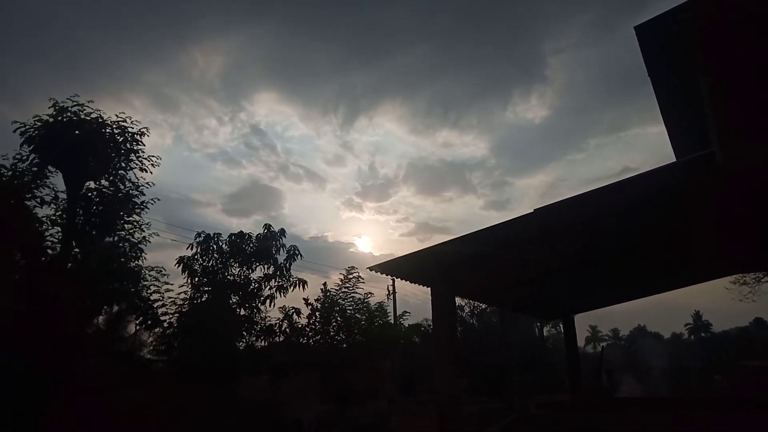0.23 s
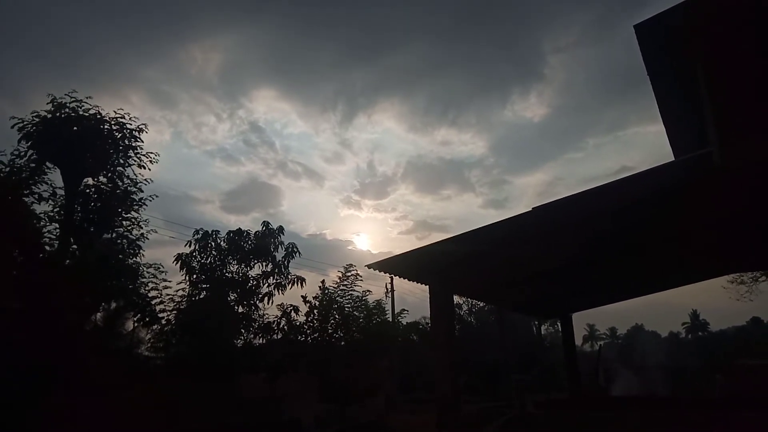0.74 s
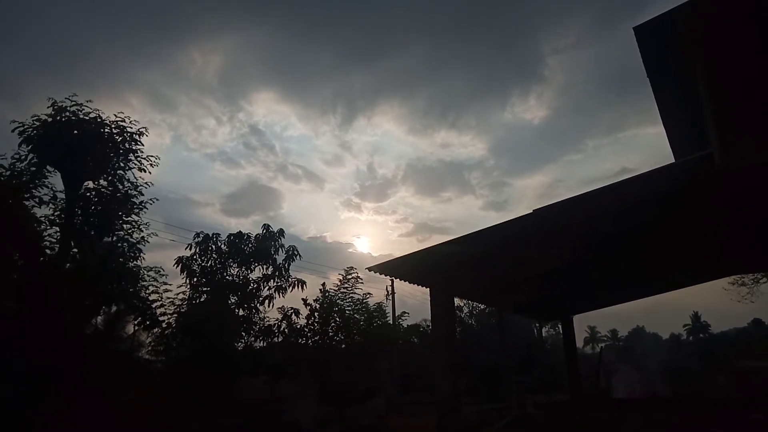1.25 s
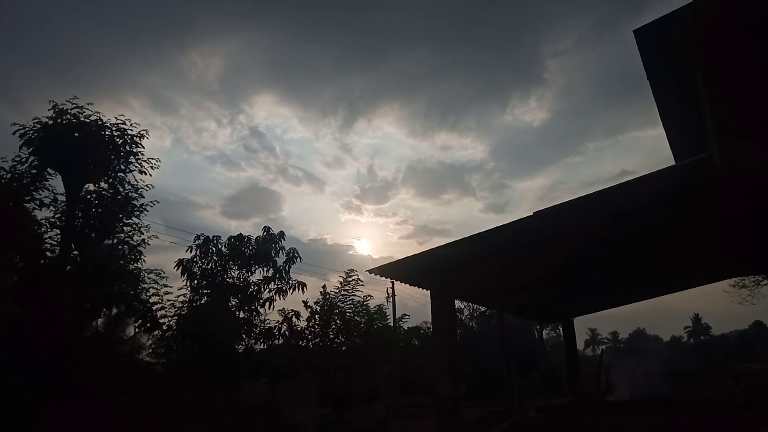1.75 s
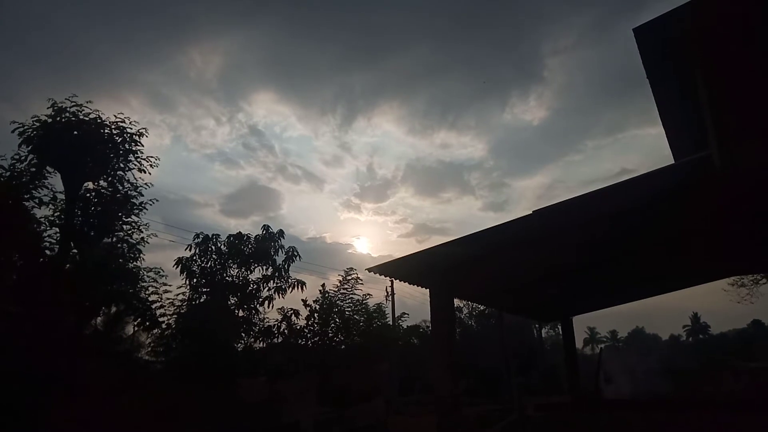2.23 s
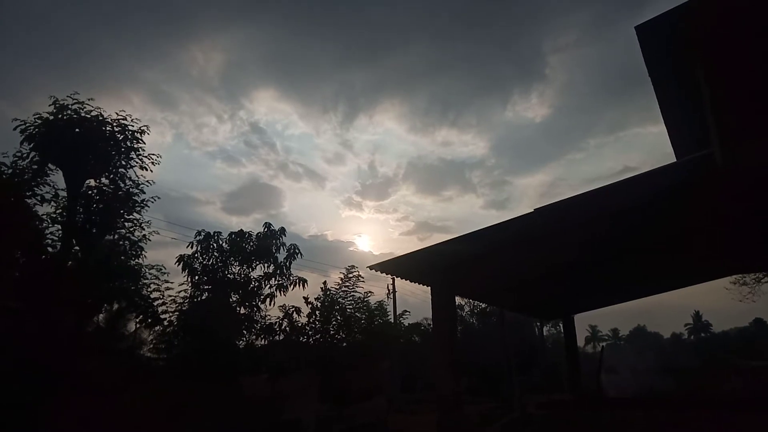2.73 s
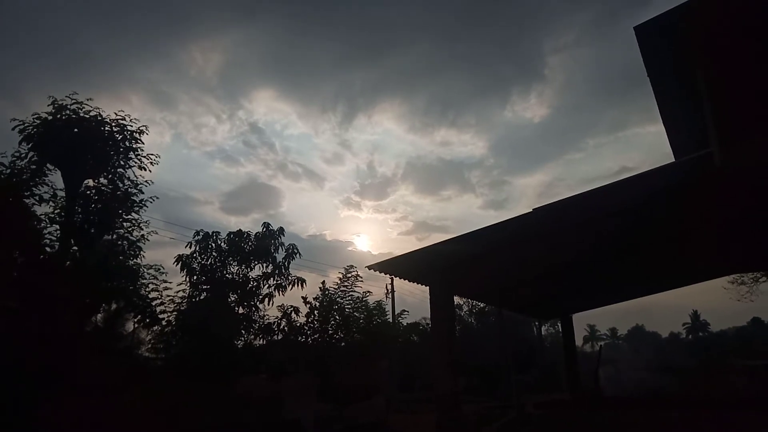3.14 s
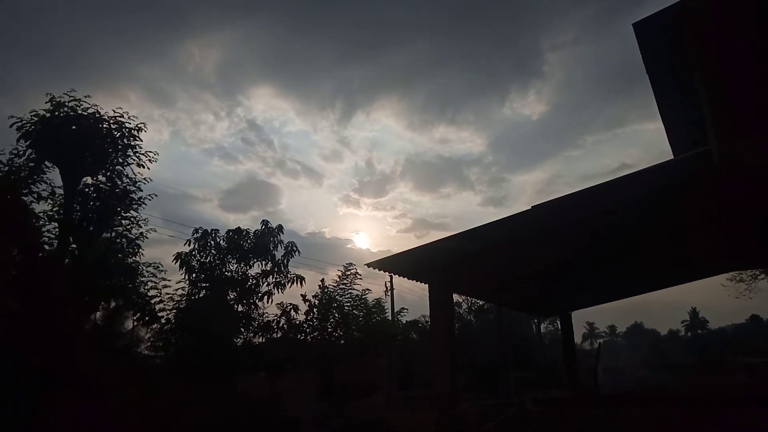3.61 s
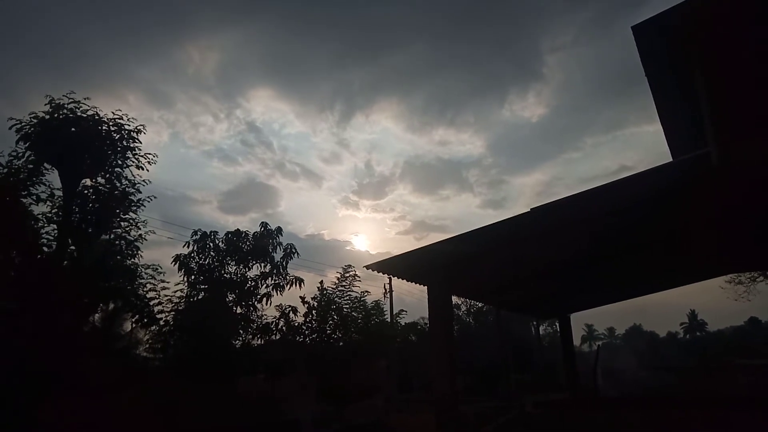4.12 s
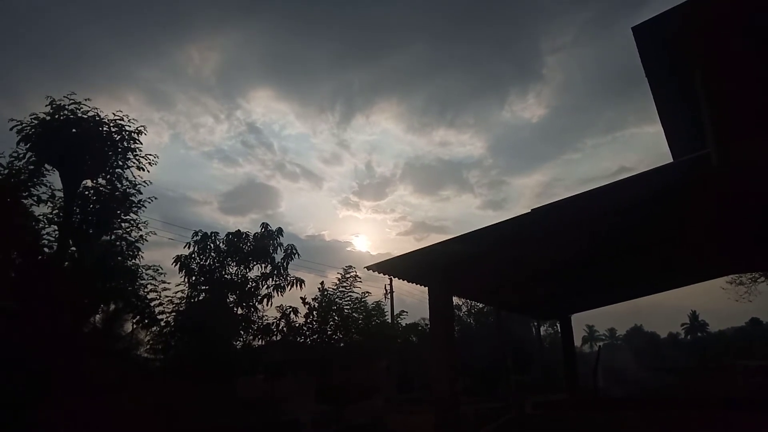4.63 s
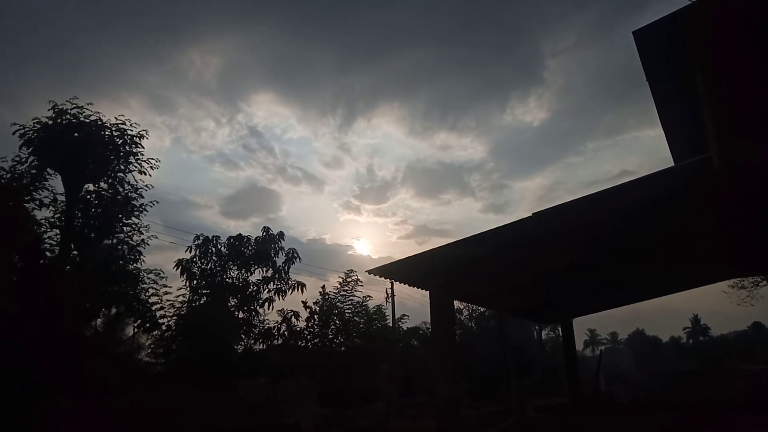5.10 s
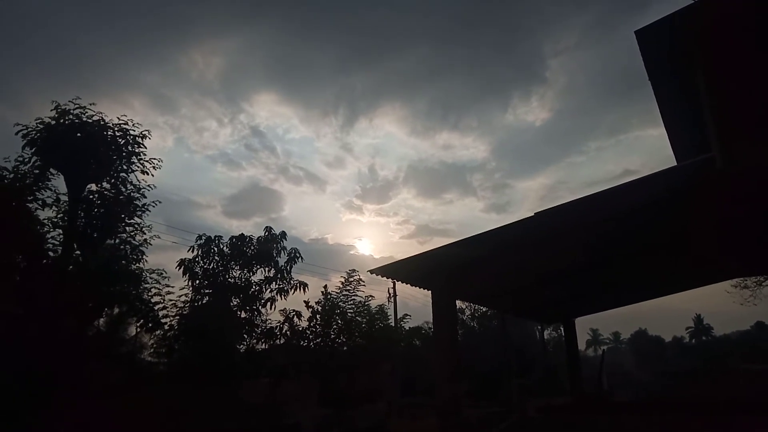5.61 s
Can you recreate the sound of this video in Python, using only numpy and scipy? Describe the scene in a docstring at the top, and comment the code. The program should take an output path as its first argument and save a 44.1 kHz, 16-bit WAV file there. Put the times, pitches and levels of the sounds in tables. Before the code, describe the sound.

Clear bird whistles in two-note phrases and a high bird's winding, diving notes echo among trees over steady insect hiss, ending with light wooden knocks.

```python
"""A low whistler calls in two-note phrases at sunrise in a village; a high singer winds, arches and dives
above it, with fainter birds, peeps and blurred chatter. Birds are near-sine glides echoed by trees and walls.
Insects and background are coloured noise, far traffic is low throbbing noise, soft bumps are swells of
band noise, and a few close knocks on wood ring decaying modes with a gritty scrape.
"""
import sys
import numpy as np
from scipy import signal
from scipy.fft import rfft, irfft, next_fast_len
from scipy.io import wavfile
from scipy.ndimage import uniform_filter1d

SR = 44100
rng = np.random.default_rng(int(sys.argv[2]) if len(sys.argv) > 2 else 0)


def unload_wav(signal):
    """Save mono or channel-first audio to the path in sys.argv[1] as 16-bit WAV at rate SR, clipped to [-1, 1]."""
    wavfile.write(
        sys.argv[1],
        SR,
        np.round(np.clip(np.atleast_2d(signal).T, -1, 1) * 32767).astype(np.int16),
    )


N = 258426  # length in samples


def undb(db):
    """Decibels to amplitude gain."""
    return 10 ** (np.asarray(db) / 20)


def unit(x):
    """Scales a sound to rms 1."""
    return x / np.sqrt(np.mean(x ** 2))


def band(count, hz, width, order):
    """Band-passed noise around a centre pitch, rms 1."""
    edges = [max(hz - width / 2, 20), hz + width / 2]
    bandpass = signal.butter(order, edges, "band", fs=SR, output="sos")
    return unit(signal.sosfilt(bandpass, rng.standard_normal(count)))


def walk(rate):
    """Random levels, rate a second, joined by smooth cosine steps; spread near 1."""
    place = np.arange(N) * rate / SR
    step = np.linspace(0, 1, 9)[:-1]
    levels = rng.standard_normal(int(place[-1]) + 2)
    ease = (1 - np.cos(np.pi * step)) / 2
    smooth = levels[:-1, None] + np.diff(levels)[:, None] * ease
    # the joins narrow the spread; 1.15 restores it
    return 1.15 * np.interp(place, np.arange(smooth.size) / 8, smooth.ravel())


def add(track, s, sound):
    """Mixes a sound into a track at a time in seconds."""
    i = min(max(int(s * SR), 0), len(track))
    track[i:i + len(sound)] += sound[:len(track) - i]


def glide(n, hz0, hz1):
    """A soft-ended tone of n samples sliding between two pitches, rms 1."""
    phase = 2 * np.pi * np.cumsum(np.linspace(hz0, hz1, n)) / SR
    return 2 * np.sin(np.pi * np.arange(n) / n) * np.sin(phase)


def sing(notes, waver, edge_s, third=0):
    """Near-sine syrinx tones; notes that touch share their phase, so they join without a click."""
    t, hz, gain = np.arange(N) / SR, np.zeros(N), np.zeros(N)
    for note in notes:
        s, note_hz, db = np.transpose(note)
        on = (t >= s[0]) & (t < s[-1])
        hz[on] = np.interp(t[on], s, note_hz)
        gain[on] = undb(np.interp(t[on], s, db))
    edge = int(edge_s * SR)
    gain = uniform_filter1d(gain, edge)
    hz = np.interp(t, t[hz > 0], hz[hz > 0])  # pitch carries on through the silences
    wavering_hz = uniform_filter1d(hz, edge) * (1 + waver * walk(60))
    phase = 2 * np.pi * np.cumsum(wavering_hz) / SR
    return np.sqrt(2) * gain * (np.sin(phase) + third * np.sin(3 * phase))


def trees(x, wet_db, t60, gap_s, walls, sway_s, clump_db=3.5, dull_hz=4400, beam_hz=100):
    """Direct sound, echoes off walls (s, dB) and a duller scattered tail from clumps of swaying leaves."""
    t = np.arange(SR) / SR
    decay = np.exp(-np.log(1000) * t / t60)
    onset = 1 - np.exp(-t / gap_s)
    clumps = undb(clump_db * walk(29.86)[:SR])
    tail = rng.standard_normal(SR) * decay * onset * clumps
    tail = undb(wet_db) * tail / np.sqrt(np.sum(tail ** 2))
    for s, db in walls:  # each wall smears its echo over a few milliseconds
        smear = rng.standard_normal(300) * np.hanning(300) / np.sqrt(112)
        add(tail, s, undb(db) * smear)
    leaves = signal.butter(N=4, Wn=dull_hz, fs=SR, output="sos")
    dull_tail = signal.sosfilt(leaves, tail)
    # moving leaves shift the path lengths, which blurs the pitch of what comes back
    swayed = np.interp(np.arange(N) + sway_s * SR * walk(40), np.arange(N), x)
    swayed *= np.minimum(np.arange(N) / (.01 * SR), 1)  # a note under way at the start throws no click
    # the beak beams high pitches at the listener; below beam_hz the sound goes mostly to the trees
    beam = signal.butter(N=8, Wn=beam_hz, btype="high", fs=SR, output="sos")
    return signal.sosfilt(beam, x) + signal.oaconvolve(swayed, dull_tail)[:N]


def shaped(shape, s, length, hz, db):
    """Places a note shape in time, pitch and level."""
    return [(s + length * u, hz * share, db + d) for u, share, d in shape]


# Two-note call of the low whistler. Each row: top of first note in seconds, its pitch in Hz, level in dB,
# start of second note in seconds, its length in seconds, top pitch in Hz, level in dB.
WHISTLER_CALLS = [(0.032, 2030, -27, 0.26, 0.21, 2154, -31.5), (2.57, 2001, -30, 2.808, 0.2, 2120, -32.5),
                  (4.361, 2009, -29.5, 4.612, .188, 2080, -33)]
# First note: up to a ledge, a bump, then down. Each row: seconds from its top, share of top pitch,
# level in dB against the top.
LEDGE_SHAPE = [(-.102, .84, -20), (-.078, .97, -7), (-.04, .975, -8), (0, 1, 0), (.028, .925, -9.5),
               (.057, .855, -13)]
# Second note: a quick peak and a long fall. Each row: share of length, share of top pitch,
# level in dB against the top.
FALL_SHAPE = [(0, .81, -14.5), (.093, 0.95, -1), (.19, 1, 0), (.31, .918, -1), (.51, .857, -5.5),
              (.68, .82, -9.5), (.8, .73, -13.5), (1, .6, -19.5)]


def whistles():
    """Pitch and level contours of both notes of every call: a ledge note, then a falling one."""
    notes = []
    for top_s, hz1, db1, start_s, length, hz2, db2 in WHISTLER_CALLS:
        notes.append(shaped(LEDGE_SHAPE, top_s, 1, hz1, db1))
        notes.append(shaped(FALL_SHAPE, start_s, length, hz2, db2))
    return notes


# Colour of the insects and steady background. Each row: frequency in Hz, relative density in dB per Hz.
AIR_COLOUR = [(25, -31.5), (170, -24), (300, -19.5), (700, -26.5), (1100, -22), (1600, -16), (2200, -9.5),
              (3500, -9), (4500, -7.5), (4950, -3), (5500, -6.5), (6500, -0.5), (8300, -3), (9300, -18),
              (10400, -33.5), (12000, -39.5), (15500, -36)]
AIR_DB = -50.5  # rms of the whole bed


def air():
    """Third-octave noise bands: insect hiss holds steady, lower bands swell and flicker in patches."""
    size = next_fast_len(N)
    f = np.fft.rfftfreq(size, 1 / SR) + 1
    swell = walk(1.493)  # shared by all bands
    colour_hz, colour_db = np.transpose(AIR_COLOUR)
    colour = undb(np.interp(np.log(f), np.log(colour_hz), colour_db))
    noise = rfft(rng.standard_normal(size)) * colour
    bed = np.zeros(N)
    for hz in 200 * 2 ** (np.arange(16) / 3):
        # the end bands take in everything below 200 and above 6400 Hz
        thirds_away = 3 * np.log2(np.clip(f, 200, 6400) / hz)
        share = np.cos(np.pi / 2 * np.clip(thirds_away, -1, 1)) ** 2
        restless = 0.12 + 1.57 / (1 + (hz / 3500) ** 4)
        motion_db = restless * (1.48 * swell + 1.1 * walk(5) + 2.45 * walk(14))
        bed += irfft(noise * share, size)[:N] * undb(motion_db)
    return unit(bed) * undb(AIR_DB)


# Level of the low rumble: slow swells of far traffic, with brief low surges near 3.85 and 5.56 s. Each row:
# time in seconds, level in dB before the throb.
RUMBLE_LEVELS = [(0.0, -69.5), (0.67, -64.5), (1.94, -75.5), (2.48, -67), (3.18, -80.5), (3.28, -67),
                 (3.79, -74), (3.85, -58.5), (3.92, -71.5), (4.41, -73.5), (4.65, -64.5), (5.47, -79),
                 (5.56, -60), (5.86, -64)]


def rumble():
    """Low traffic noise that swells and throbs."""
    s, db = np.transpose(RUMBLE_LEVELS)
    throb_db = 1.5 * walk(5.5) + 2.3 * walk(15)
    level = undb(np.interp(np.arange(N) / SR, s, db) + throb_db)
    return level * band(count=N, hz=118, width=99, order=2)


# Short faint calls. Each row: start in seconds, length in seconds, start pitch in Hz, end pitch in Hz,
# level in dB.
FAINT_CALLS = [(0, .059, 4180, 4000, -52.5), (1.364, 0.098, 3280, 3290, -66.5),
               (1.499, 0.091, 2236, 2260, -64), (1.593, 0.037, 2280, 2236, -54.5),
               (1.871, 0.043, 1276, 1300, -74), (1.97, 0.058, 531, 498, -71), (2.225, .06, 1056, 947, -73),
               (2.517, 0.054, 1046, 1046, -68.5), (2.715, 0.019, 4800, 5004, -55),
               (2.736, .016, 5090, 4710, -54), (2.957, 0.013, 3080, 3500, -48.5),
               (3.03, 0.05, 505, 478, -68.5), (3.72, .06, 1002, 995, -72.5),
               (4.042, 0.043, 1276, 1240, -67.5), (4.369, 0.022, 3037, 3310, -55),
               (4.584, .028, 935, 1066, -60), (4.674, .021, 2530, 2700, -51),
               (4.979, .014, 3390, 3450, -55), (5.085, .028, 2780, 2650, -53.5),
               (5.185, .054, 622, 576, -65.5), (5.231, 0.078, 908, 897, -71),
               (5.471, 0.075, 750, 700.3, -66.5)]


def peeps():
    """Each faint call is one short soft-ended glide."""
    out = np.zeros(N)
    for s, length, hz0, hz1, db in FAINT_CALLS:
        add(out, s, undb(db) * glide(int(length * SR), hz0, hz1))
    return out


# Distant chatter. Each row: start in seconds, length in seconds over which chirps begin, lowest pitch in Hz,
# highest pitch in Hz, level in dB before the scaling by length and each chirp's random cut.
CHATTER_BURSTS = [(.02, 0.13, 2400, 2740, -52), (.42, 0.18, 2270, 3960, -59), (0.6, 0.25, 2086, 2904, -54),
                  (0.698, 0.14, 3146, 3950, -50.5), (1.098, 0.25, 2330, 3010, -72),
                  (1.448, 0.26, 1690, 3023, -60.5), (1.852, 0.12, 1920, 2390, -67),
                  (2.101, 0.33, 1588, 3034, -59), (3.549, 0.092, 2895, 3383, -59),
                  (3.599, 0.33, 1797, 2800, -60.5), (4.565, 0.077, 987, 1640, -58),
                  (4.904, .2, 2250, 3030, -57.5), (5.098, 0.65, 1917, 3314, -72)]


def chatter():
    """Every burst is a crowd of quick chirps at random times, pitches and strengths."""
    out = np.zeros(N)
    crowds = rng.random((len(CHATTER_BURSTS), 30, 4))
    for (s, length, lo_hz, hi_hz, db), chirps in zip(CHATTER_BURSTS, crowds):
        span_hz = hi_hz - lo_hz
        for when, start, end, size in chirps:
            chirp = glide(int(0.016 * SR), lo_hz + start * span_hz, lo_hz + end * span_hz)
            add(out, s + when * length, undb(db - 4.5 * size) * np.sqrt(length) * chirp)
    return out


# Held notes of the high singer that dive. Each row: start in seconds, start pitch in Hz, held pitch in Hz,
# dive start in seconds, dive length in seconds, end pitch in Hz, held level in dB, dive level in dB.
SINGER_DIVES = [(.063, 3360, 3801, .148, .035, 2496, -25.5, -28.5),
                (2.44, 3824, 3899, 2.478, .025, 2275, -22, -21.5)]
RISE, SWELL = .4, 0.62  # shares of the hold at which pitch and full level arrive
PLUNGE = 0.44  # share of the dive at its loudest
START_DB, RISE_DB, CATCH_DB = -22.5, -7.5, -8  # against the held level: start, on pitch, just before the dive
END_DB = -33.5  # against the dive level


def dive(s, hz0, hz, dive_s, length, hz1, db, dive_db):
    """Contour of a held note: up to pitch, a swell, a catch, then a straight plunge."""
    hold = dive_s - s
    return [(s, hz0, db + START_DB),
            (s + RISE * hold, hz, db + RISE_DB),
            (s + SWELL * hold, hz, db),
            (dive_s, hz, db + CATCH_DB),
            (dive_s + PLUNGE * length, hz + PLUNGE * (hz1 - hz), dive_db),
            (dive_s + length, hz1, dive_db + END_DB)]


# Short arched notes of the high singer. Each row: start in seconds, length in seconds, start pitch in Hz,
# middle pitch in Hz, end pitch in Hz, level in dB at the middle.
SINGER_ARCHES = [(.343, .067, 3340, 3420, 3220, -43), (.42, .062, 3382, 3560, 3360, -42.5),
                 (2.38, 0.0564, 3680, 3800, 3836, -27), (2.598, .07, 3393, 3500, 3230, -33),
                 (2.855, .035, 2420, 2790, 2280, -40), (2.906, .036, 2310, 2530, 2500, -31.5),
                 (3.462, 0.024, 5452, 5490, 5450, -48.5), (3.488, .055, 5430, 5740, 5750, -51)]
ARCH_EDGE_DB = -16  # ends against the middle


def arch(s, length, hz0, mid_hz, hz1, db):
    """Contour of a note whose pitch bends through three points; the level is flat with soft ends."""
    u = np.linspace(-1, 1, num=17)
    hz = mid_hz + u * (hz1 - hz0) / 2 + u ** 2 * ((hz0 + hz1) / 2 - mid_hz)
    return np.transpose([s + length * (u + 1) / 2, hz, db + ARCH_EDGE_DB * u ** 4])


# Level note of the high singer that overlaps one of its winding notes, one list a note. Each row: time in
# seconds, pitch in Hz, level in dB.
SINGER_OVERLAP_NOTE = [
    [(2.005, 3400, -53.5), (2.011, 3530, -42.5), (2.071, 3613, -34.5), (2.086, 3620, -44.5),
     (2.219, 3655, -50), (2.24, 3617, -68)],
]
# Winding notes of the high singer, one list a note. Each row: time in seconds, pitch in Hz, level in dB.
SINGER_WINDINGS = [
    [(2.065, 4180, -51), (2.095, 4420, -43.5), (2.12, 4229, -30), (2.145, 4055, -42), (2.235, 4103, -31.5),
     (2.28, 4460, -39), (2.292, 4940, -63)],
    [(2.995, 2152, -43), (3.02, 2540, -47.5), (3.055, 2950, -34.5), (3.072, 3243, -25.5),
     (3.0835, 3114, -26.5)],
    [(3.084, 4173, -33.5), (3.09, 3572, -31), (3.098, 3430, -24.5), (3.13, 3117, -24.5),
     (3.155, 2833, -41.5)],
    [(3.285, 4640, -54), (3.32, 4600, -40.5), (3.345, 4770, -38.5), (3.37, 4855, -49), (3.42, 4857, -38.5),
     (3.455, 4720, -48)],
    [(3.668, 4740, -52), (3.69, 4713, -34), (3.715, 4740, -33.5), (3.75, 4873, -39.5), (3.86, 4790, -37),
     (3.885, 4170, -29), (3.9, 3904, -23), (3.915, 4100, -27.5), (3.93, 4401, -38), (3.947, 4524, -32.5),
     (3.965, 4000, -28.5), (3.985, 3456, -27), (4.0, 3468, -26.5), (4.015, 2980, -42.5)],
]


def high_singer():
    """Syrinx tones of the high singer, with a trace of third harmonic; its level note that overlaps a winding
    one sounds as a separate pure tone."""
    notes = SINGER_WINDINGS + [arch(*row) for row in SINGER_ARCHES] + [dive(*row) for row in SINGER_DIVES]
    return sing(notes, 0.00174, 0.0028, third=.0013) + sing(SINGER_OVERLAP_NOTE, .002, .005)


# Soft low bumps. Each row: start in seconds, length in seconds, centre in Hz, width in Hz, level in dB
# at the top of the swell.
SOFT_BUMPS = [(3.64, 0.11, 401, 200, -73), (3.768, 0.14, 330, 260, -61), (4.018, 0.21, 310, 220, -60.5),
              (2.25, 0.55, 320, 201, -78), (4.55, .3, 300, 200, -81), (5.62, .16, 400, 495, -61.5)]


def bumps():
    """Dull swells of low band noise."""
    out = np.zeros(N)
    for s, length, hz, width, db in SOFT_BUMPS:
        n = int(length * SR)
        swell = np.sin(np.pi * np.arange(n) / n) ** 0.39
        add(out, s, undb(db) * swell * band(count=SR, hz=hz, width=width, order=3)[-n:])
    return out


# Long thin notes of far birds. Each row: start in seconds, length in seconds, start pitch in Hz,
# middle pitch in Hz, end pitch in Hz, level in dB at the middle, before the flutter.
FAR_NOTES = [(4.42, 0.11, 1256, 1273, 1260, -67), (4.62, 0.17, 1330, 1317, 1320, -61.5),
             (4.858, .15, 1310, 1280, 1285, -59.5), (5.05, .3, 1299, 1373, 1365, -57.5),
             (5.38, .18, 1340, 1348, 1376, -56), (5.621, .26, 1413, 1437, 1436, -55),
             (5.053, .5, 3835, 3850, 3820, -62), (5.526, .42, 3830, 3834, 3870, -57.5)]
FLUTTER_DB, FADING_DB = 4, 0.5  # spread of the fast and the slow level wander


def far_birds():
    """Low and high far birds hold thin tones; the air makes them flutter and fade."""
    out = np.zeros(N)
    for high_bird in (False, True):
        notes = [arch(*row) for row in FAR_NOTES if (row[2] > 2500) == high_bird]
        flutter = undb(FLUTTER_DB * walk(30) + FADING_DB * walk(12))
        out += sing(notes, 0.00498, .012) * flutter
    return out


# Knocks on wood. Each row: time in seconds, gain in dB of the modes up to 1400 Hz (thud),
# gain in dB of the modes above (ring), level in dB of the scrape before its decay.
WOOD_KNOCKS = [(5.4988, -45, -37.5, -66), (5.569, -35.5, -48, -45), (5.583, -52, -35, -43),
               (5.599, -46, -37, -43.5), (5.605, -60, -41, -50), (5.611, -31.5, -39, -51)]
# Modes of the board. Each row: frequency in Hz, relative level in dB, 60 dB decay time in seconds.
WOOD_MODES = [(308, 4.5, 0.035), (705, -15, 0.074), (1120, -7.5, 0.037), (1720, -4, 0.06),
              (2140, 5.5, 0.018), (2660, -14, 0.038), (3130, -3.5, 0.036)]


def knocks():
    """Each blow rings the board's modes with its own weights; a gritty scrape dies after it."""
    out, t = np.zeros(N), np.arange(SR // 4) / SR
    hz, mode_db, t60 = np.transpose(WOOD_MODES)[:, :, None]
    contact = 1 - np.exp(-(t / 0.00083) ** 2)  # a soft contact keeps the treble out
    chances = rng.standard_normal((len(WOOD_KNOCKS), len(WOOD_MODES), 1))
    for (s, thud_db, ring_db, scrape_db), chance in zip(WOOD_KNOCKS, chances):
        weight = undb(mode_db + np.where(hz > 1400, ring_db, thud_db) + 1.5 * chance)
        modes = weight * np.exp(-np.log(1000) * t / t60) * np.sin(2 * np.pi * hz * t)
        ring = np.sum(modes, axis=0)
        scrape = band(count=len(t), hz=1960, width=920, order=2) * np.exp(-t / 0.046)
        add(out, s, contact * (ring + undb(scrape_db) * scrape))
    return out


def scene():
    """Birds and knocks, each group in its own echoes, over the bumps, rumble and air."""
    whistler = sing(whistles(), 0.0023, 0.0036)
    low_walls = [(.015, -6), (.11, -18.5), (.2, -22.5)]
    low = trees(whistler, -6.0, 1.28, 0.0084, low_walls, .00012, clump_db=2.5, dull_hz=2160, beam_hz=1645)
    high_walls = [(.005, -9), (.011, -11.5), (.093, -16)]
    high = trees(high_singer(), -6.0, 0.81, 0.0052, high_walls, .00006)
    far = trees(far_birds() + peeps(), -8, 0.64, 0.013, [], .0001)
    blur = trees(chatter(), 1.4, 0.34, 0.015, [], .0001)  # more scattered than direct
    near = trees(knocks(), -6.0, 0.38, .005, [], .00001) + bumps()
    return (low + high + far + blur + near + rumble() + air())[None]


TOP_HZ = 15550  # upper edge of what is heard


def record(dry):
    """A steep elliptic low-pass cuts the top."""
    return signal.sosfilt(signal.ellip(8, .2, 70, TOP_HZ, fs=SR, output="sos"), dry)


dry = scene()
out = record(dry)
unload_wav(out)
```